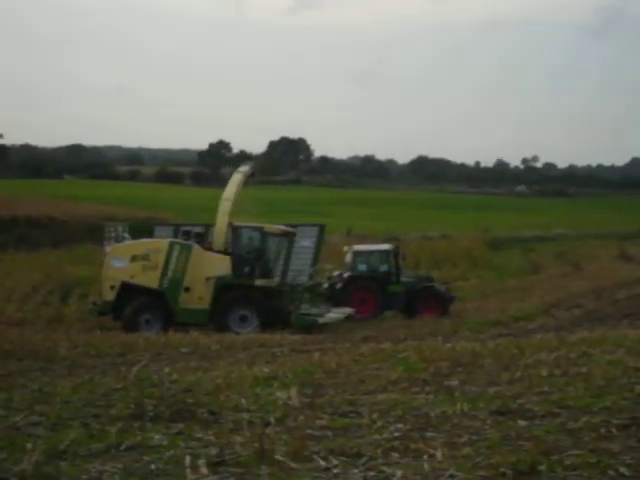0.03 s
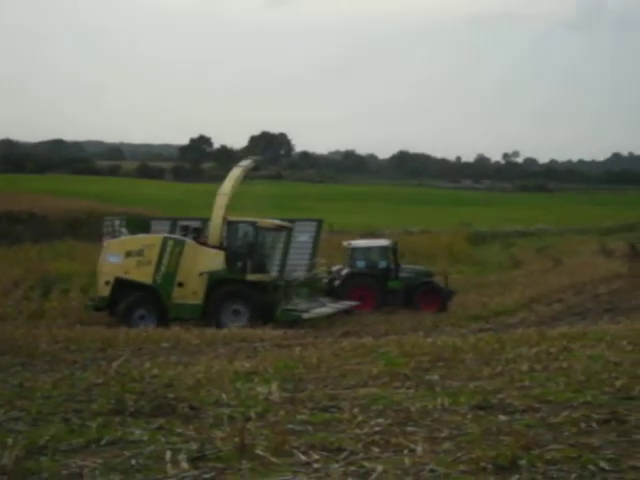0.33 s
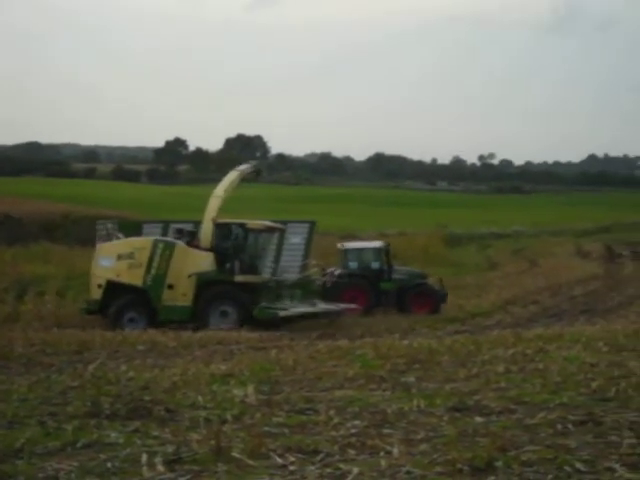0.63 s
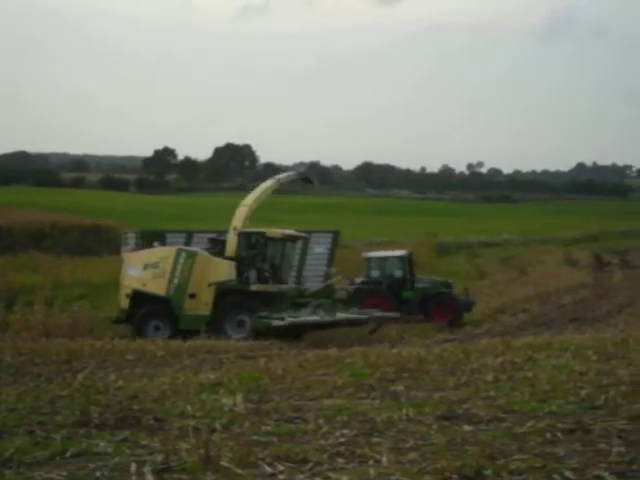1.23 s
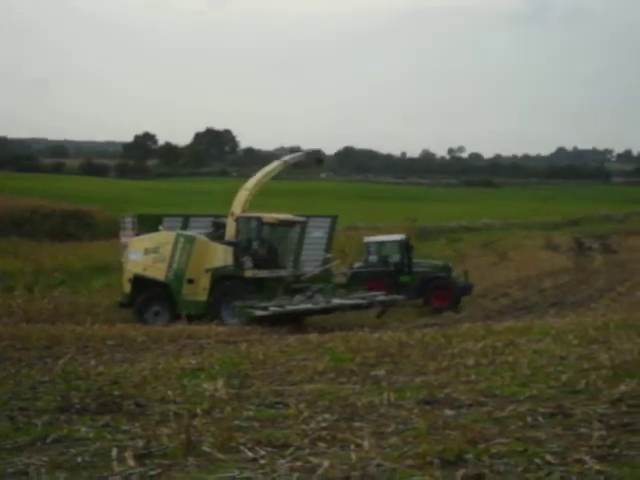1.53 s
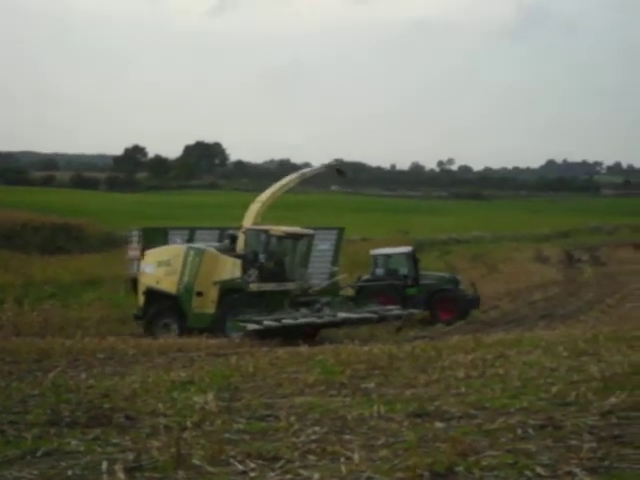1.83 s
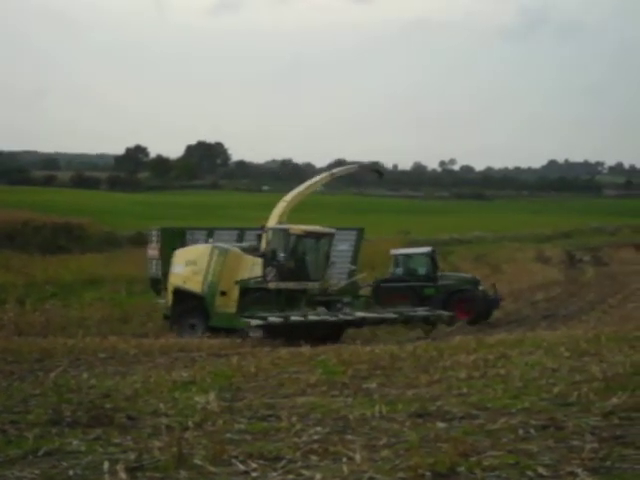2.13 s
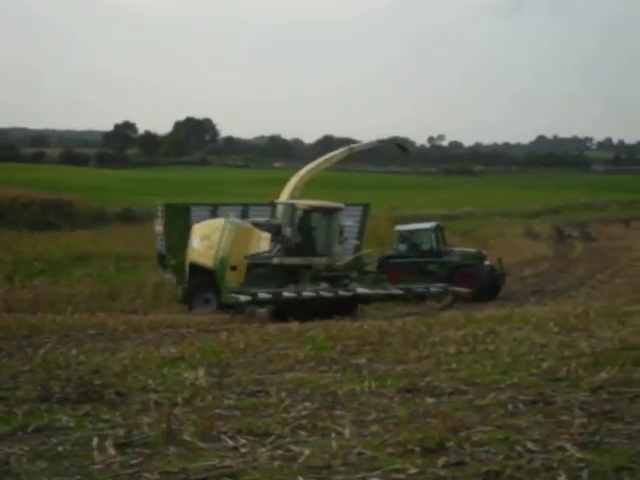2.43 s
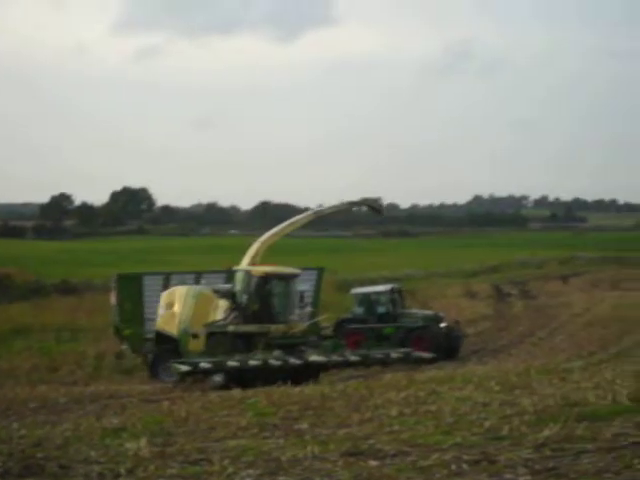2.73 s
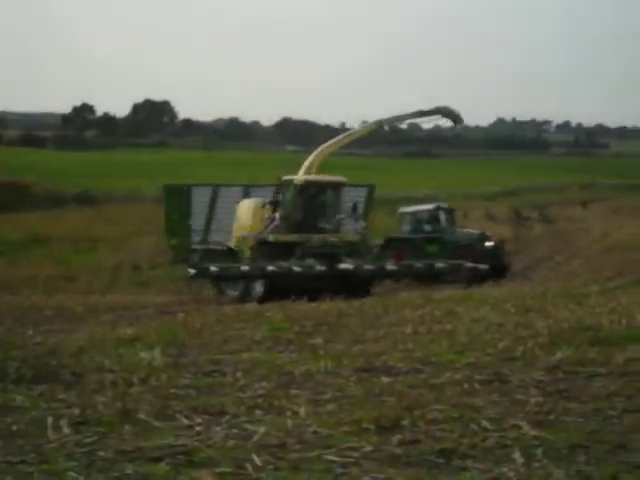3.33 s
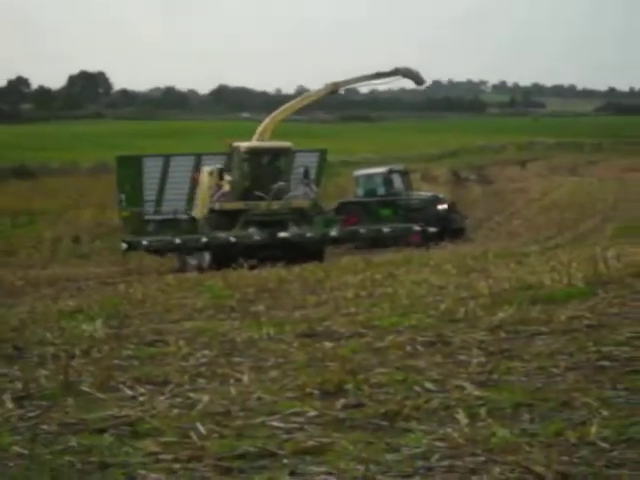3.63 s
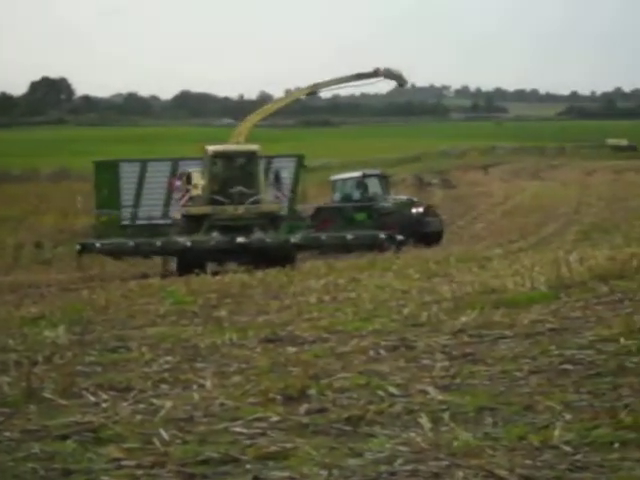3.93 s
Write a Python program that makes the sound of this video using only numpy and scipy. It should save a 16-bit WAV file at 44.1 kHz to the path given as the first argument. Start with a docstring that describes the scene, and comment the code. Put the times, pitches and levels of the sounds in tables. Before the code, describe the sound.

A forage harvester chops crop some way off in an open field, its low drone blending with a tractor's under a thin whine. Gusts thump the microphone near the start, a few ticks follow, and the hiss gradually dulls.

```python
"""A forage harvester chops crop in a distant field, its engine droning along with a tractor's.
The engine sags under load and recovers; cutter drum and gears follow it, whining over the rush of crop.
The machine turns its front to the listener and sounds duller. Wind buffets the microphone of a small
camera and overloads it, and a few sharp ticks ring the camera's body."""
import sys
import numpy as np
from scipy import signal
from scipy.fft import rfft, irfft
from scipy.io import wavfile

SR = 44100
rng = np.random.default_rng(int(sys.argv[2]) if len(sys.argv) > 2 else 0)


def store_pcm(level_fs):
    """Save levels as 16-bit WAV."""
    pcm = np.round(np.clip(level_fs, -1, 1) * 32767).astype(np.int16)
    wavfile.write(sys.argv[1], SR, np.atleast_2d(pcm).T)


N = 176400
T = np.arange(N) / SR

# How many cycles the harvester's engine makes each second: t/s, f/Hz
ENGINE_SPEED = [(0, 70.0), (.45, 70.6), (1, 70.05), (1.5, 69.65), (1.8, 69.3), (2.05, 69.4), (2.5, 71.2),
                (2.8, 70.9), (3.25, 70.9), (3.55, 71.15), (4, 71.0)]
# Which way the harvester faces: t/s, heading (0 side-on, 1 head-on)
HEADING = [(0, 0), (1.2, 0.17), (2.2, 0.19), (2.7, 0.49), (3.2, 0.88), (4, 1.01)]


def amp(db):
    """Turns decibels into a factor to multiply by."""
    return 10 ** (np.asarray(db) / 20)


def unit(x):
    """Scales a signal to an average strength (rms) of 1."""
    return x / np.sqrt(np.mean(abs(x) ** 2) + 1e-20)


def curve(points, column=1):
    """Joins the values in one column of a table by straight lines over time."""
    rows = np.array(points)
    return np.interp(T, rows[:, 0], rows[:, column])


def add(mix, start_s, sound):
    """Mixes a sound in at a given time."""
    part = mix[max(round(start_s * SR), 0):][:len(sound)]
    part += sound[:len(part)]


def wander(hz):
    """A random wobble of strength 1, mostly slower than the given rate."""
    f = np.fft.rfftfreq(N, 1 / SR)
    return unit(irfft(rfft(rng.standard_normal(N)) * (f > 0) / np.sqrt(1 + (f / hz) ** 4), N))


def noise(spectrum, low_hz=8):
    """Noise of strength 1, shaped by rows of f/Hz, level/dB and fading away below low_hz."""
    f = np.fft.rfftfreq(N, 1 / SR) + 1e-3
    hz, db = np.transpose(spectrum)
    shape = amp(np.interp(np.log(f), np.log(hz), db)) / np.sqrt(1 + (low_hz / f) ** 10)
    return unit(irfft(rfft(rng.standard_normal(N)) * shape, N))


def tone(hz, rough, flutter_hz):
    """A note of strength 1 that flutters on its way through moving air."""
    flutter = 1 + rough * (wander(flutter_hz) + 1j * wander(flutter_hz))
    cycles = np.cumsum(hz) / SR + rng.random()
    return unit((flutter * np.exp(2j * np.pi * cycles)).real)


def harmonics(hz, table, rough, flutter_hz):
    """Notes at whole multiples of a turning part's rate; their levels follow the heading."""
    turn = curve(HEADING)
    return sum(amp(side + (front - side) * turn) * tone(k * hz, rough, flutter_hz)
               for k, side, front in table)


def engines(tractor_hz=72.7):
    """Two engines run at slightly different speeds, so their drones beat against each other."""
    # The harvester's main notes swell and fade: t/s, then level/dB at 4, 5 and 15 times its rate
    main_notes = [(0, -25, -32, -49), (.35, -25.5, -32.5, -47), (.6, -29.5, -23.5, -45.5),
                  (1.0, -31, -26.5, -50.5), (1.2, -32.5, -25, -40.5), (1.65, -24, -20, -29.5),
                  (2.0, -22.5, -25.5, -33.5), (2.25, -30.5, -24.5, -40.5), (2.8, -31.5, -21.5, -38),
                  (3.2, -22.5, -24, -35), (3.5, -22.5, -27, -31), (3.8, -17.5, -21, -33.5),
                  (4, -22.5, -24.5, -40)]
    # Its weaker notes, and the tractor's: multiple of the rate, side-on level/dB, head-on level/dB
    weak_notes = [(1, -36, -35.5), (2, -25, -23.5), (3, -36, -27.5), (8, -47, -44), (10, -35, -42),
                  (20, -51.5, -42)]
    tractor_notes = [(1, -23, -32), (2, -27, -29.5), (4, -39.5, -33)]
    speed = curve(ENGINE_SPEED)
    harvester = sum(amp(curve(main_notes, column)) * tone(k * speed, rough=.2, flutter_hz=14)
                    for column, k in enumerate((4, 5, 15), start=1))
    harvester += harmonics(speed, weak_notes, rough=.33, flutter_hz=3.5)
    return harvester + harmonics(np.full(N, tractor_hz), tractor_notes, rough=.3, flutter_hz=4.6)


def cutter_drum(knives_per_cycle=5.39):
    """The engine spins a drum whose knives pass so quickly that they hum."""
    # The low notes of the hum: t/s, then level/dB at 2 and 3 times the knife rate
    low_notes = [(0, -35, -30.5), (.6, -38.5, -26.5), (1.35, -39.5, -37.5), (2.0, -26.5, -33.5),
                 (2.35, -35.5, -24), (2.7, -34.5, -29.5), (3.25, -28, -35), (3.7, -37, -35),
                 (4, -32.5, -46)]
    # Its high notes: multiple of the knife rate, side-on level/dB, head-on level/dB
    high_notes = [(4, -48.5, -58.5), (5, -42, -64), (6, -48, -57)]
    knife_hz = curve(ENGINE_SPEED) * knives_per_cycle
    hum = sum(amp(curve(low_notes, column)) * tone(k * knife_hz, rough=.51, flutter_hz=11)
              for column, k in enumerate((2, 3), start=1))
    return hum + harmonics(knife_hz, high_notes, rough=.26, flutter_hz=4.6)


def gears(teeth_per_cycle=19.76):
    """Gear teeth meet and whine, rising and falling in pitch with the engine."""
    # The lasting notes: multiple of the tooth rate, side-on level/dB, head-on level/dB
    notes = [(1, -39.5, -39.5), (2, -46, -50)]
    # A faint top note, and a shrill whine that beams forward and flares up: t/s, level/dB
    top_level = [(0, -55.5), (1.3, -61), (1.85, -51), (2.3, -62), (2.7, -69), (4, -69.5)]
    shrill_level = [(0, -40.5), (.45, -44.5), (1.3, -42), (1.7, -49.5), (1.87, -36.5), (2.2, -37.5),
                    (2.5, -46.5), (2.72, -44.5), (3.0, -42), (3.11, -27.5), (3.22, -38.5), (3.35, -32.5),
                    (3.43, -45.5), (3.6, -43), (3.8, -53), (3.9, -38), (4, -46)]
    tooth_hz = curve(ENGINE_SPEED) * teeth_per_cycle
    whine = harmonics(tooth_hz, notes, rough=.89, flutter_hz=12)
    top = amp(curve(top_level)) * tone(3 * tooth_hz, rough=.46, flutter_hz=11)
    shrill = amp(curve(shrill_level)) * tone(2 * tooth_hz, rough=.4, flutter_hz=26)
    return whine + top + shrill


def turbocharger():
    """The turbocharger whistles thinly, higher when the engine works hard."""
    # The whistle: t/s, f/Hz, level/dB
    whistle = [(0, 3885, -57), (.6, 3865, -57), (1.3, 3880, -56), (1.9, 3910, -54), (2.3, 3880, -58),
               (2.8, 3835, -64), (4, 3810, -68)]
    return amp(curve(whistle, column=2)) * tone(curve(whistle), rough=.25, flutter_hz=6)


def fuzzy_whistle():
    """A faint, fuzzy whistle, perhaps a drive belt, fades away."""
    # The whistle: t/s, f/Hz, level/dB
    whistle = [(0, 2275, -41), (.5, 2285, -41.5), (1.2, 2262, -50.5), (2, 2245, -53), (2.6, 2295, -57),
               (4, 2295, -64.5)]
    return amp(curve(whistle, column=2)) * tone(curve(whistle), rough=1.2, flutter_hz=25)


def crop_rush(throb=.048, swell_db=.36, patchy_db=.5, low_hz=382):
    """Crop rushes through the blower, throbbing slightly with the engine and duller head-on."""
    # Noise of crop, blower and tracks, from the side and from the front: f/Hz, relative level/dB
    side_spectrum = [(240, -42.5), (400, -6), (500, -9), (730, -1.5), (836, -4), (1120, -1), (1290, -10),
                     (1540, -12), (1670, -16.5), (2340, -13), (2680, -16), (2930, -24), (3590, -22.5),
                     (4070, -36.5), (5290, -53), (8950, -120)]
    front_spectrum = [(240, -38.5), (400, -10.5), (505, -13.5), (759, 0.5), (828, -3.5), (1120, -4.5),
                      (1290, -10), (1430, -15), (1540, -17.5), (2630, -23.5), (2840, -19.5), (2950, -27),
                      (3520, -33.5), (4070, -45), (5290, -80), (8950, -120)]
    # The flow of crop through the blower: t/s, relative level/dB
    flow = [(0, 0), (.7, -.5), (1.3, 0.5), (1.9, -0.5), (2.3, 0.5), (2.8, 0), (3.3, 0.6), (3.55, 1.2),
            (4, -0.5)]
    turn = np.clip(curve(HEADING), 0, 1)
    side = amp(-20 + patchy_db * wander(6)) * noise(side_spectrum, low_hz)
    front = amp(-20.5 + patchy_db * wander(4.6)) * noise(front_spectrum, low_hz)
    rush = np.sqrt(1 - turn) * side + np.sqrt(turn) * front
    pulse = 1 + throb * np.cos(2 * np.pi * np.cumsum(curve(ENGINE_SPEED)) / SR)
    return rush * pulse * amp(curve(flow) + swell_db * wander(4))


def spout():
    """Chopped crop hisses out of the spout, loudest while it faces the listener."""
    # The colour of the hiss: f/Hz, relative level/dB
    spectrum = [(1500, -19), (2100, -9.5), (2280, 5), (2600, -2.5), (2950, -20.5), (3550, -8.5),
                (4200, -26), (5000, -51.5)]
    # Its loudness: t/s, level/dB
    level = [(0, -36.5), (.5, -38.5), (1.15, -32.5), (1.5, -46.5), (2.2, -44), (2.7, -53.5), (4, -60.5)]
    return amp(curve(level)) * noise(spectrum, low_hz=1400)


def rumble(level_db=-19, head_on_db=-1.0):
    """Exhaust and ground rumble under the drone, a little softer head-on."""
    # The colour of the rumble: f/Hz, relative level/dB
    spectrum = [(10, -17.5), (25, -3.5), (45, -3), (80, 2.5), (110, 0.5), (180, 1), (260, -3), (370, -12),
                (470, -27), (900, -44.5)]
    return amp(level_db + head_on_db * curve(HEADING)) * noise(spectrum)


def wind(edge_s=.012, lumpy_db=2, thump_cycles=.5):
    """Lumpy gusts hit the microphone, and single swirls of air thump against it."""
    # Churning air at the microphone: f/Hz, relative level/dB
    spectrum = [(15, -19.5), (45, -7), (100, 0), (140, 3.5), (210, 0.5), (330, -5.5), (550, -11.5),
                (900, -21.5), (1800, -40), (4000, -52.5)]
    # The gusts: start t/s, length/s, level/dB
    gusts = [(0.172, 0.06, -18.5), (0.402, 0.09, -12), (0.476, .12, -11.5), (0.606, .085, -10),
             (0.703, .15, -12.5), (0.857, 0.084, -9.5), (0.982, 0.076, -10.5), (1.795, 0.073, -18.5),
             (2.727, 0.028, -21)]
    # The swirls: t/s, f/Hz, level/dB
    thumps = [(0.453, 610, 2), (0.532, 375, 2), (0.544, 420, 5.5), (.589, 292, 3), (.642, 564, -0.5),
              (.79, 394, -0.5), (.902, 258, 1), (.984, 460, 1), (1.012, 330, -6), (1.656, 405, -4),
              (1.864, 296, -6.5), (2.588, 343, -3.5)]
    level = sum(amp(db) * np.clip(np.minimum(T - start, start + length - T) / edge_s + .5, 0, 1)
                for start, length, db in gusts)
    out = level * amp(lumpy_db * wander(54)) * noise(spectrum)
    for middle, hz, db in thumps:
        cycles = (T - middle) * hz
        swell = np.exp(-(cycles / thump_cycles) ** 2 / 2)
        out += amp(db) * swell * np.sin(2 * np.pi * (cycles + rng.random()))
    return out


def ticks(rise_s=.00039):
    """Each sharp tick makes the camera's body ring briefly."""
    # The ticks: t/s, level/dB
    hits = [(.543, -17), (.641, -16), (.902, -14), (1.779, -21), (2.6, -7.5), (2.641, -8.5)]
    # The notes of the body: f/Hz, relative level/dB, time to fade by 60 dB/s, delay/s
    body_notes = [(1400, 5, 0.01, 0.0038), (1950, 0.5, 0.0067, 0), (2550, -1.5, 0.016, 0.0029),
                  (3250, -5.5, 0.013, 0.0032), (3866, -6.5, 0.0079, 0.0001)]
    out, t = np.zeros(N), np.arange(2048) / SR
    rise = np.minimum(t / rise_s, 1)
    for start, hit_db in hits:
        for hz, note_db, fade_s, delay in body_notes:
            fade = amp(note_db - 60 * t / fade_s)
            ring = rise * fade * np.sin(2 * np.pi * (hz * t + rng.random()))
            add(out, start + delay, amp(hit_db) * ring)
    return out


def crop_clump(middle_s=3.71, width_s=.059, level_db=-31, hz=1900):
    """One clump of crop swishes through the blower."""
    # The colour of the swish: f/Hz, relative level/dB
    spectrum = [(hz / 2, -40), (hz * .78, -14), (hz, 0), (hz * 1.3, -14), (hz * 2, -40)]
    swell = np.exp(-((T - middle_s) / width_s) ** 2 / 2)
    return amp(level_db) * swell * noise(spectrum, low_hz=900)


def scene():
    """Machines in the field and wind at the microphone, mixed into one channel."""
    machines = engines() + cutter_drum() + gears() + turbocharger() + fuzzy_whistle()
    return (machines + crop_rush() + spout() + rumble() + wind() + ticks() + crop_clump())[None]


def record(dry, overload=.75, mic_top_hz=4175, ceiling=.69, final_top_hz=15800):
    """The microphone squashes loud peaks and loses treble; peaks that are still too tall are cut flat."""
    mic_filter = signal.firwin(161, mic_top_hz, window=("kaiser", 8), fs=SR)
    final_filter = signal.firwin(255, final_top_hz, window=("kaiser", 9), fs=SR)
    squashed = dry / (1 + (dry / overload) ** 8) ** (1 / 8)
    dulled = signal.oaconvolve(squashed, mic_filter[None], "same")
    clipped = np.clip(dulled, -ceiling, ceiling)
    return signal.oaconvolve(clipped, final_filter[None], "same")


dry = scene()
out = record(dry)
store_pcm(out)
```